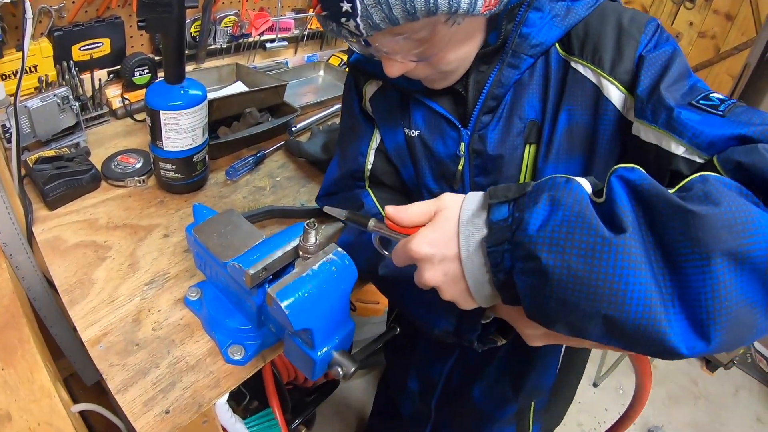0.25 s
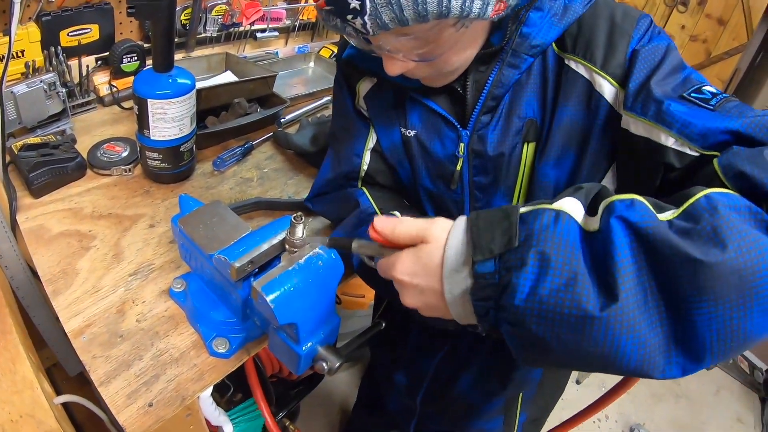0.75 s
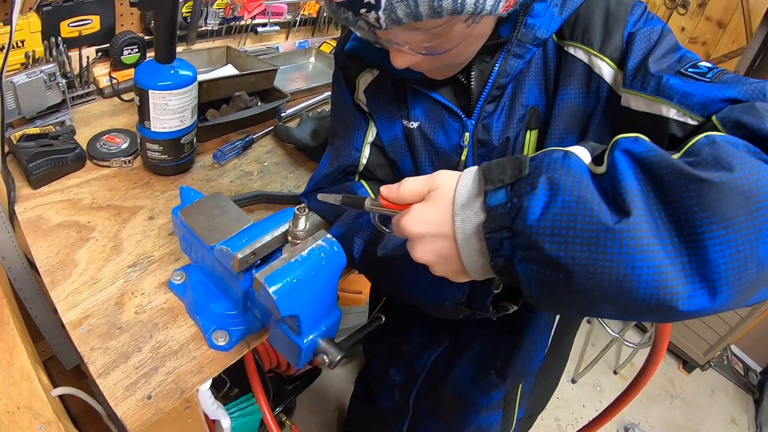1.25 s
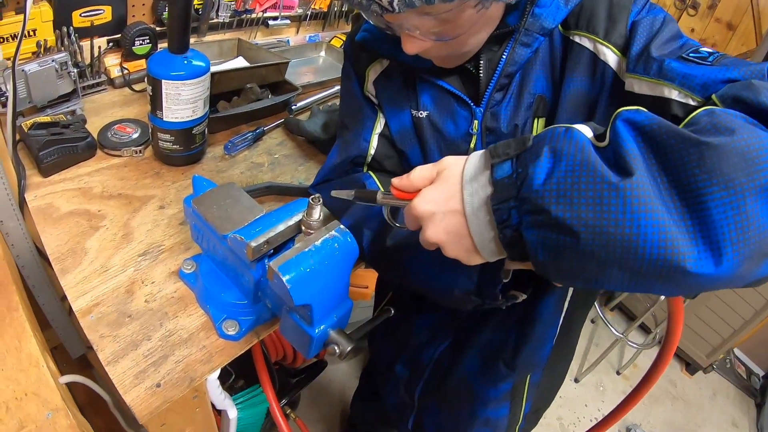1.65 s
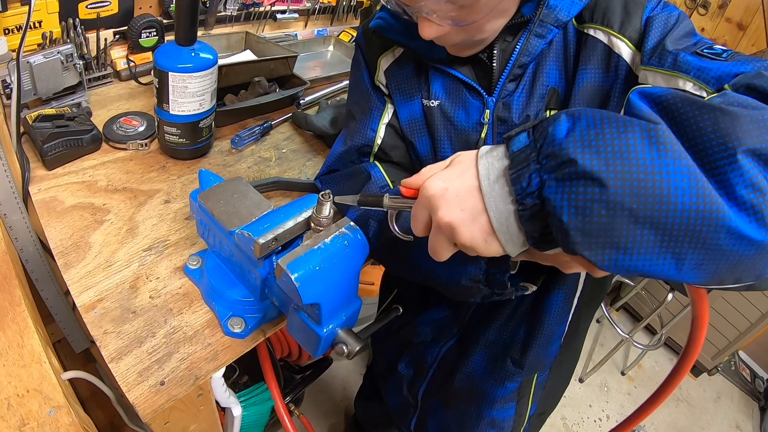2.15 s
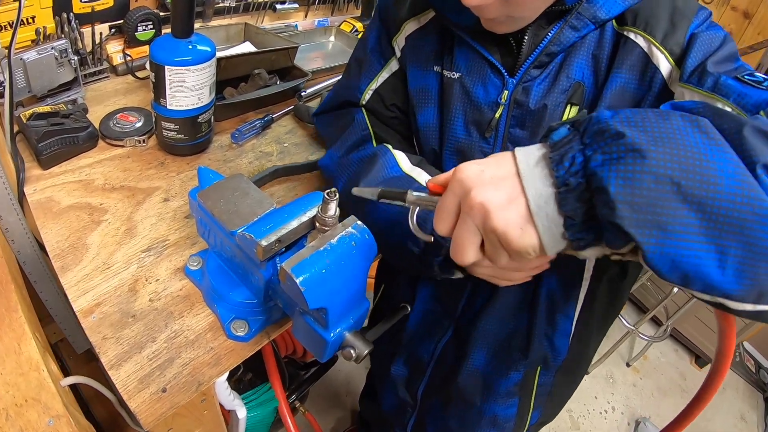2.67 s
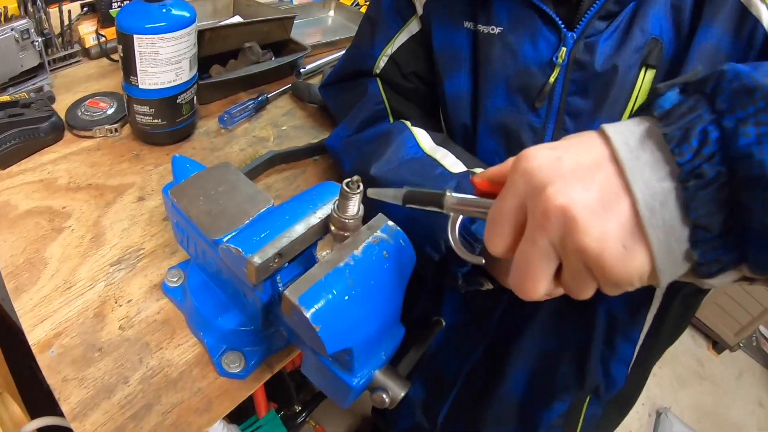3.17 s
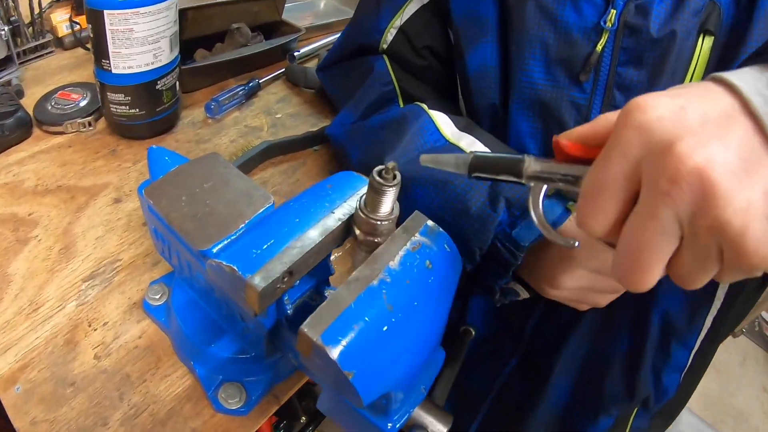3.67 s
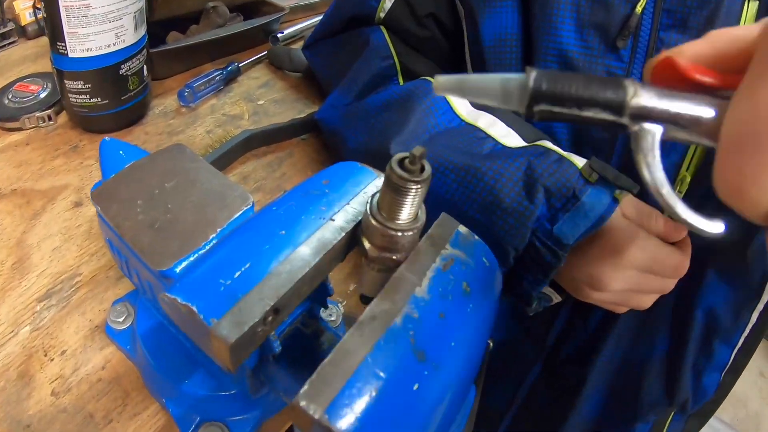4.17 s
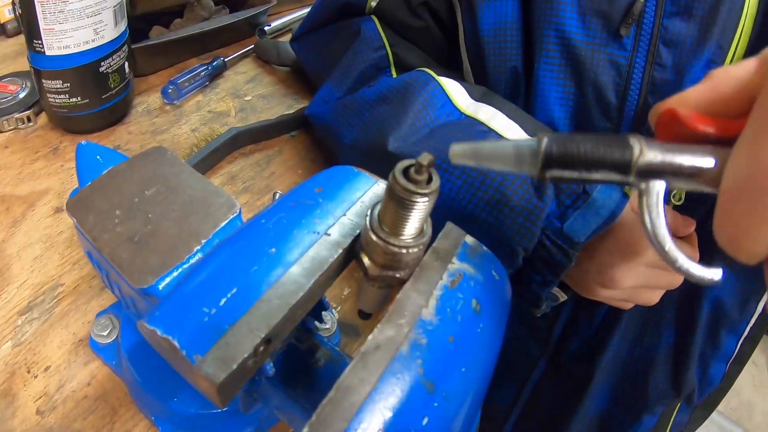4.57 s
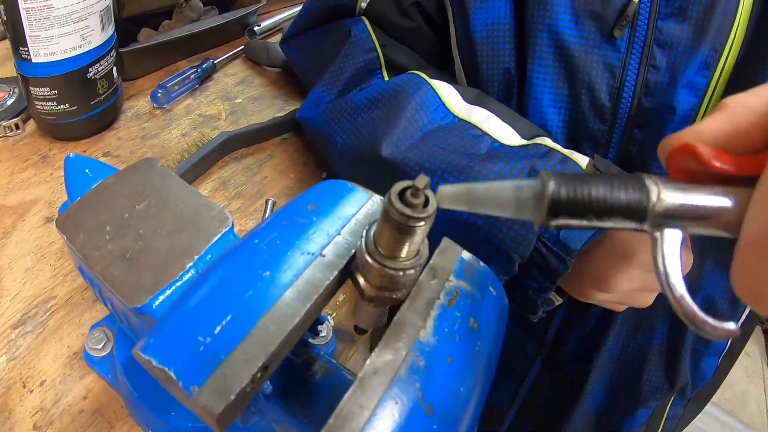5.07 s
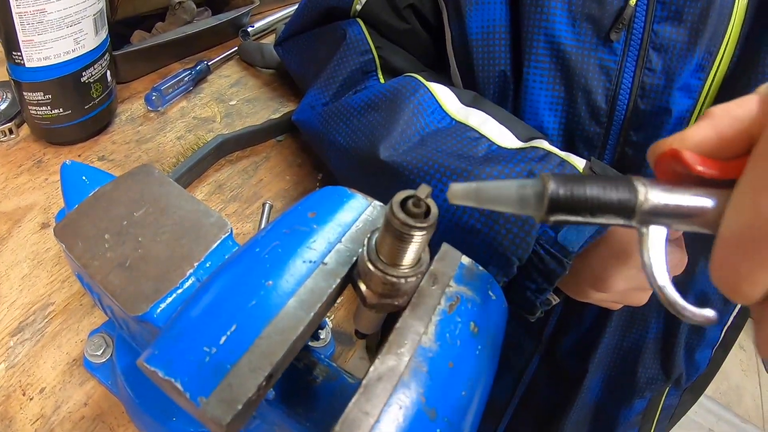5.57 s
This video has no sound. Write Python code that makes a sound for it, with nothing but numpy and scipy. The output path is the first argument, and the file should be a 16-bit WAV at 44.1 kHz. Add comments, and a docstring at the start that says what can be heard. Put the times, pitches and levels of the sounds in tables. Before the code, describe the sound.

A blow gun's compressed air hisses loudly, pauses about half a second, then returns, howling shrilly whenever it sweeps across a small hollow metal part.

```python
"""A blow gun's jet roars and sizzles over a small hollow metal part; its howl near 7 kHz swells at each crossing.
Jet noise is coloured turbulence; the howl is that turbulence through a moving resonance, the whistle through a still one.
The trigger is let go once, and a dull hiss lingers, its treble fading evenly like room reverberation. Stray air thumps
mostly on the right, a hand scuffs the camera housing, and a low lumpy rumble, a far machine at first, turns wind-like
as a port pair gives way to one sheltered microphone. A gain control ducks whatever is too loud and soon recovers."""
import sys
import numpy as np
from scipy import signal
from scipy.fft import rfft, irfft, next_fast_len
from scipy.io import wavfile

SR = 44100
rng = np.random.default_rng(int(sys.argv[2]) if len(sys.argv) > 2 else 0)


def generate_wav(signal):
    """Clip the signal to [-1, 1] and save it as 16-bit WAV at the path in sys.argv[1]."""
    frames = np.transpose(np.atleast_2d(signal))
    scaled = np.clip(frames, -1, 1) * 32767
    pcm = np.round(scaled).astype(np.int16)
    wavfile.write(sys.argv[1], SR, pcm)


N = 257103
T = np.arange(N) / SR
SIZE = next_fast_len(N)
HZ = np.maximum(np.arange(SIZE // 2 + 1) * SR / SIZE, 1.)  # spectral bins


def jet():
    """Turbulent mixing noise in bands, plus the howl that the hollow's resonance draws from shed eddies."""
    # open jet between crossings, as hand and camera move: (time [s], roar level [dB], howl level [dB])
    open_jet = [(0, -28, -26.5), (.55, -29, -26.5), (1.07, -27.5, -24.5), (1.4, -29, -25.5),
                (1.75, -30, -23), (1.95, -30, -28.5), (2.5, -31, -29.5), (2.95, -32.5, -29),
                (3.5, -33.5, -30.5), (3.8, -39, -34), (4.05, -35.5, -32.5), (4.35, -34, -33.5),
                (4.65, -31, -29), (5.3, -32, -27.5), (5.83, -32, -28)]
    # treble relative to the roar: (time [s], sizzle level [dB], topmost air level [dB])
    treble_levels = [(0, -0.5, -12), (2.0, 0, -11), (2.3, -3, -14.5), (3.0, 1, -11.5), (3.5, -4, -11.5),
                     (3.7, -8.5, -7), (4.3, -9, -7.5), (4.45, -9, -16), (4.8, -12, -19), (5.83, -12, -19)]
    treble_follows = 0.6  # share of the roar's swell in dB that sizzle and air take part in
    rim_above_hz = 1400  # the rim lifts only the brighter part of the roar
    _, middle, treble = port_shares()

    # relative spectral density at the ports and the single microphone: (frequency [Hz], density [dB per Hz])
    roar_at_ports = [(150, -26), (500, -27), (1000, -15), (1900, -6.5), (2300, -5.5), (2680, -2),
                     (2950, -6.5), (3220, -2), (3500, -5.5), (4400, -8.5), (4800, -5), (5150, -7),
                     (5550, -4), (8000, -9), (9000, -33)]
    roar_sheltered = [(150, -6.5), (600, -8), (1500, -3.5), (2100, -1.5), (2650, 1.5), (3100, -3),
                      (3600, 1.5), (4000, -4.5), (4600, -6.5), (5500, -3.5), (8200, -9.5), (9000, -27)]
    roar = hiss(roar_at_ports, roar_sheltered, middle, patchy_db=1.6, rate=2.6)
    whistle = nozzle_whistle(middle)
    # the same for the sizzle: (frequency [Hz], density [dB per Hz])
    sizzle_at_ports = [(8000, 0.5), (8700, -3.5), (9400, 1.5), (10000, -4.5), (10600, -13.5), (11400, -9.5),
                       (12000, -25)]
    sizzle_sheltered = [(8000, 4), (8800, 9), (9700, -3), (10500, 1.5), (11300, 4), (12000, -10)]
    sizzle = hiss(sizzle_at_ports, sizzle_sheltered, middle, patchy_db=0.98, rate=16)
    # the same for the topmost air: (frequency [Hz], density [dB per Hz])
    air_at_ports = [(11000, -18), (11800, 1), (13000, 0), (14000, -5.5), (15000, -12), (16200, -22)]
    air_sheltered = [(11000, -15), (11800, 7), (12800, -2), (13400, -10), (14000, -45)]
    air = hiss(air_at_ports, air_sheltered, treble, patchy_db=0.0, rate=30)
    howl = hollow_howl(middle)

    sizzle_db, air_db = in_time(treble_levels)
    top = from_db(sizzle_db) * sizzle + from_db(air_db) * air
    broad = roar + whistle
    low = signal.sosfiltfilt(signal.butter(2, rim_above_hz, fs=SR, output="sos"), broad)
    roar_db, howl_db = in_time(open_jet)
    howl_swell_db, roar_swell_db = crossings()
    swelled = low + from_db(roar_swell_db) * (broad - low)
    swelled_top = from_db(treble_follows * roar_swell_db) * top
    blown = from_db(roar_db) * (swelled + swelled_top) + from_db(howl_db + howl_swell_db) * howl
    return trigger() * blown


def hollow_howl(share):
    """Cavity resonance: eddies shed in quick bunches at the rim excite a moving pole pair; others stay broad."""
    # (time [s], resonance centre [Hz])
    centres = [(0, 6640), (1.32, 6550), (1.54, 7380), (2.65, 6730), (3.7, 7250), (3.88, 7630), (5.2, 7330),
               (5.38, 7000), (5.83, 7500)]
    # what each microphone set passes, ports then single: (frequency [Hz], density [dB per Hz])
    howl_at_ports = [(4000, -18), (5300, -10.5), (6200, 3), (7600, 6.5), (8500, -10), (10500, -43)]
    howl_sheltered = [(4000, 0), (5000, -10.5), (5700, 9.5), (6500, 5), (7300, 10.5), (8300, 5.5),
                      (8800, -21), (10500, -55)]
    width_hz, skirt_db = 1420, -4.5  # width of each resonant stage; level of the broad part
    eddies = hiss(howl_at_ports, howl_sheltered, share, patchy_db=0.35, rate=100)
    outside = np.roll(eddies, SR // 10, axis=1)  # shifted 0.1 s to stand for eddies that miss the hollow
    return rms_one(resonate(eddies, in_time(centres)[0], width_hz) + from_db(skirt_db) * outside)


def nozzle_whistle(share):
    """Narrow-band noise: white turbulence through a fixed resonance gives a breathy, wavering whistle."""
    # (time [s], level relative to the roar [dB])
    whistle_levels = [(0, -11), (.6, -10), (1.02, -6), (1.65, -7.5), (2.2, -11), (3.4, -11.5), (3.7, -10)]
    centre_hz, width_hz = 3870, 480  # width of each resonant stage
    pair, single = [irfft(white, SIZE)[..., :N] for white in white_pair()]
    turbulence = np.sqrt(1 - share) * pair + np.sqrt(share) * single
    tone = resonate(turbulence, np.full(N, centre_hz), width_hz) * from_db(1.5 * drift(19))
    return from_db(in_time(whistle_levels)[0]) * tone


def crossings():
    """Edge and cavity excitation in dB: it builds as the jet enters, holds, and drops as it leaves."""
    # (enters [s], stays, at least the build-up time [s], howl swell [dB], roar swell [dB])
    passes = [(1.5, 0.16, 3.5, 0.3), (1.76, 0.032, 4, .4), (1.965, 0.071, 8, 0.2), (2.087, 0.091, 17, 6.5),
              (2.298, 0.099, 12, 1.5), (2.951, 0.12, 13, 4), (3.214, 0.14, 14, 4.5), (3.535, 0.07, 14, 4),
              (4.681, 0.15, 13, 5), (4.98, 0.13, 7, 2), (5.28, 0.16, 12.5, 3), (5.665, .11, 4.5, 2)]
    enter_s, leave_s, roar_leads_s = 0.053, .03, 0.019  # the rim is met before the hollow
    howl_db, roar_db = 0, 0
    for s, stays, howl_swell, roar_swell in passes:
        leaves = s + max(stays, enter_s)
        corners = np.array([s, s + enter_s, leaves, leaves + leave_s])
        howl_db = howl_db + howl_swell * np.interp(T, corners, [0, 1, 1, 0])
        roar_db = roar_db + roar_swell * np.interp(T + roar_leads_s, corners, [0, 1, 1, 0])
    return howl_db, roar_db


def trigger():
    """Valve throttling: the gain falls exponentially after release and climbs back to full when pressed."""
    let_go_s, pressed_s = 0.5486, 1.064  # starts to close; fully open again
    close_db_per_s, open_db_per_s = 469, 752
    closing_db = close_db_per_s * (let_go_s - T)
    opening_db = open_db_per_s * (T - pressed_s)
    return from_db(np.minimum(np.maximum(closing_db, opening_db), 0))


def lingering_hiss():
    """Exponential decay: after release a dull hiss drops once in its body; its treble fades like reverberation."""
    # relative spectral density of body and treble: (frequency [Hz], density [dB per Hz])
    body_colour = [(400, 3.5), (700, -4.5), (1200, -2), (1800, 2), (2300, 1), (4000, -5.5), (5200, -22)]
    treble_colour = [(4500, -10), (6400, 0), (7600, -2), (8800, -4), (10500, -10), (13000, -21),
                     (14500, -40)]
    from_s, until_s = .6, 1.064  # until the trigger is fully down again
    level_db, drops_s, drop_db, drop_takes_s = -47.5, 0.823, 8, .03
    treble_level_db, treble_db_per_s = -44.5, 56
    pair = white_pair()[0]
    body_db = level_db - drop_db * np.clip((T - drops_s) / drop_takes_s, 0, 1)
    treble_db = treble_level_db - treble_db_per_s * np.maximum(T - from_s, 0)
    body = from_db(body_db) * coloured(pair, body_colour)
    treble = from_db(treble_db) * coloured(pair, treble_colour)
    return sounding(from_s, until_s) * (body + treble)


def gusts():
    """Wind pressure on a microphone: low noise independent at each port, and damped swings that suck first."""
    # lumpy wash: (full from [s], holds [s], level before the left and right offsets [dB])
    washes = [(2.33, 1.24, -53.5), (3.12, 0.11, -36), (3.35, 0.061, -29.5), (3.63, 0.1, -47)]
    # relative spectral density of the wash: (frequency [Hz], density [dB per Hz])
    wash_colour = [(9, -31), (15, -1.5), (94, 1), (189, -6), (400, -23), (700, -33), (1100, -53),
                   (1980, -100)]
    # amplitude is before damping: (start [s], left amplitude [dB], right amplitude [dB], swing rate [Hz])
    buffets = [(2.364, -60, -21, 71), (2.394, -60, -23.5, 71), (2.492, -25.5, -34, 44.3),
               (2.569, -50, -23, 68), (2.7, -60, -19.5, 64.5), (3.133, -50, -14.5, 74),
               (3.194, -21, -40, 40.4), (3.219, -50, -17, 69.6), (3.357, -60, -15.5, 61),
               (3.393, -60, -19, 60), (3.42, -45, -23, 61.4), (3.459, -51, -20.5, 81),
               (3.648, -52, -23, 91.5), (3.689, -41, -30, 80), (5.312, -19.5, -21.5, 75.6)]
    left_db, right_db = -7, 5.5  # offsets of the wash
    damping_cycles = 0.91  # cycles over which a buffet dies to 1/e
    own = coloured(rfft(rng.standard_normal((2, SIZE))), wash_colour)
    own = own * from_db([3.0 * drift(31), 6.4 * drift(21.6)])
    out = from_db([[left_db], [right_db]]) * bursts(washes, 0.03, 148) * rms_one(own)
    for s, buffet_left_db, buffet_right_db, hz in buffets:
        cycles = np.arange(SR // 10) / SR * hz
        onset = np.minimum(7.2 * cycles, 1)
        swing = -np.sin(2 * np.pi * cycles) * np.exp(-cycles / damping_cycles) * onset
        start = round(s * SR)
        out[:, start:start + len(swing)] += np.outer(from_db([buffet_left_db, buffet_right_db]), swing)
    both = out.mean(axis=0)  # all that is left once the change-over is complete
    return both + np.sqrt(1 - port_shares()[2]) * (out - both)


def handling():
    """Friction noise and modal ringing: a hand shifts on the camera housing, scuffing and knocking it."""
    # (full from [s], holds [s], level [dB])
    scuffs = [(2.612, .05, -36.5), (2.735, 0.06, -39)]
    # relative spectral density of the scuffs: (frequency [Hz], density [dB per Hz])
    scuff_colour = [(120, -25), (180, -4), (280, 2), (450, 0.5), (700, -6.5), (1200, -2), (1800, -8),
                    (2600, -19)]
    # (time [s], strength [dB], to which each mode's level is added)
    knocks = [(2.612, -28), (2.652, -27.5), (2.773, -40)]
    # housing modes: (frequency [Hz], relative level [dB], time to fall 60 dB [s])
    modes = [(367, -6, 0.071), (430, -4, 0.027), (990, -6, 0.016), (1600, -8, 0.033)]
    scuff = coloured(white_pair()[0], scuff_colour) * from_db(1.2 * drift(70))
    out = bursts(scuffs, 0.01, 85) * scuff
    for hz, level_db, t60 in modes:
        clicks = np.full(N, 1e-18)  # tiny floor keeps the filter out of denormal numbers
        for s, knock_db in knocks:
            clicks[round(s * SR)] = from_db(knock_db + level_db)
        r, w = from_db(-60 / (t60 * SR)), 2 * np.pi * hz / SR
        out = out + signal.lfilter([0, np.sin(w)], [1, -2 * r * np.cos(w), r * r], clicks)
    return out


def rumble():
    """Low-frequency coherence: a low lumpy rumble, a far machine at first, wind-like at the single microphone."""
    # (time [s], level [dB])
    rumble_levels = [(0, -48.5), (.76, -51.5), (1.14, -49), (2.2, -52.5), (3.44, -50.5), (4.2, -41.5),
                     (5.83, -43.5)]
    # relative density at the ports, then at the single microphone: (frequency [Hz], density [dB per Hz])
    rumble_at_ports = [(20, -30), (35, -9), (57, 3), (80, -2), (105, -38), (160, -2.5), (200, -9.5),
                       (300, -17), (450, -22), (800, -20)]
    rumble_sheltered = [(12, -39), (20, -10), (44, -1), (177, 1.5), (240, -5), (406, -13), (447, -17),
                        (900, -15.5), (1170, -13), (1980, -120)]
    lumpy = hiss(rumble_at_ports, rumble_sheltered, port_shares()[0], patchy_db=2.5, rate=4.5)
    return from_db(in_time(rumble_levels)[0]) * lumpy


def port_shares():
    """Power-complementary crossfade: the single microphone's share of power in bass, middle and treble."""
    # one row per band: (port pair's level beforehand [dB], fade starts [s], fade rate [dB per s])
    changeover = [(-1, 3.67, 11), (-0.15, 3.664, 99), (-.1, 4.36, 300)]
    shares = []
    for before_db, s, db_per_s in changeover:
        ports_db = min(before_db, 0) - db_per_s * np.maximum(T - s, 0)
        shares.append(1 - from_db(ports_db) ** 2)
    return shares


def white_pair():
    """Partial coherence: white spectra at two ports share a phase-shifted common part; the single one is its own."""
    # (frequency [Hz], phase by which left leads [rad])
    port_phase = [(20, 0), (700, .6), (1720, 1.6), (2150, 2.9), (2900, 4.4), (3600, 5.5), (4100, 6.3),
                  (5000, 7.1), (5900, 9.2), (6500, 11.8), (7200, 12.7), (7900, 14.2), (13000, 17.3),
                  (15000, 21)]
    # (frequency [Hz], share of power common to both [0-1])
    port_common = [(60, 0.97), (300, 0.78), (1000, 0.25), (3000, 0.51), (5000, 0.68), (7000, 0.5),
                   (8500, 0.27), (14000, 0.084)]
    # (frequency [Hz], left minus right level [dB])
    port_balance = [(60, -2), (700, 1), (1300, 0.5), (2000, 5), (3300, -0.5), (5500, 5.5), (9000, -0.5),
                    (12000, -2.5), (15000, 2)]
    common, left, right, single = rfft(rng.standard_normal((4, SIZE)))
    alike = np.clip(at_hz(port_common), 0, 1)
    turn = np.exp(.5j * at_hz(port_phase))
    side = from_db(at_hz(port_balance) / 2)
    shared, apart = np.sqrt(alike) * common, np.sqrt(1 - alike)
    pair = np.array([(shared * turn + apart * left) * side,
                     (shared / turn + apart * right) / side])
    return pair, single


def hiss(at_ports, sheltered, share, patchy_db, rate):
    """Turbulent noise: incoherent powers of both microphone sets add, and the strength wavers."""
    pair, single = white_pair()
    heard = np.sqrt(1 - share) * coloured(pair, at_ports) + np.sqrt(share) * coloured(single, sheltered)
    return heard * from_db(patchy_db * drift(rate))


def coloured(spectrum, colour):
    """Spectral shaping: noise of a given density at rms 1, with nothing outside the ends of the table."""
    inside = (HZ > colour[0][0]) & (HZ < colour[-1][0])
    return rms_one(irfft(spectrum * from_db(at_hz(colour)) * inside, SIZE)[..., :N])


def resonate(x, centre_hz, width_hz):
    """Resonance: two equal pole pairs in cascade, their centre moving in short blocks; rms 1."""
    out, state = np.empty_like(x), np.zeros((2, 2, 2))
    r = np.exp(-np.pi * width_hz / SR)
    for i in range(0, N, 512):
        w = 2 * np.pi * centre_hz[i] / SR
        stage = [1 - r * r, 0, r * r - 1, 1, -2 * r * np.cos(w), r * r]
        out[:, i:i + 512], state = signal.sosfilt([stage, stage], x[:, i:i + 512], zi=state)
    return rms_one(out)


def drift(rate):
    """Slow random modulation: noise through two one-pole low-passes with corners at rate in Hz, spread 1."""
    r = np.exp(-40 * np.pi * rate / SR)  # computed at a twentieth of the sample rate
    noise = rng.standard_normal(N // 20 + 2002)
    slow = signal.lfilter([1], [1, -2 * r, r * r], noise)[2000:]
    return np.interp(np.arange(N) / 20, np.arange(len(slow)), rms_one(slow))


def bursts(rows, rise_s, dies_db_per_s):
    """Power summation: gain of overlapping bursts that rise ahead of their time, hold and die exponentially."""
    each = []
    for s, holds, db in rows:
        rise = np.clip((T - s) / rise_s + 1, 0, 1)
        each.append(rise * from_db(db - dies_db_per_s * np.maximum(T - s - holds, 0)))
    return np.sqrt(np.sum(np.square(each), axis=0))


def sounding(first, last):
    """Linear gating: 1 between two moments, with 15 ms fades outside."""
    return np.interp(T, [first - .015, first, last, last + .015], [0, 1, 1, 0])


def in_time(rows):
    """Linear interpolation: every column of a curve at every sample."""
    s, *columns = np.transpose(rows)
    return [np.interp(T, s, c) for c in columns]


def at_hz(points):
    """Interpolation on a logarithmic frequency axis: a table read at every spectral bin."""
    hz, value = np.transpose(points)
    return np.interp(np.log(HZ), np.log(np.maximum(hz, 1)), value)


def from_db(db):
    """Logarithmic level: decibels to amplitude gain."""
    return 10 ** (np.asarray(db) / 20)


def rms_one(x):
    """Power normalisation: scale to rms 1."""
    return x / np.sqrt(np.mean(x ** 2) + 1e-20)


def gain_control(x):
    """Compression: ducks by a share of the excess over a threshold and recovers within a fraction of a second."""
    above_db, excess_share = -19.5, 0.6
    listens_s, recovers_s = 0.012, 0.06  # time constants
    r = np.exp(-1 / (listens_s * SR))
    power = signal.lfilter([1 - r], [1, -r], np.mean(x ** 2, axis=0))
    level_db = 10 * np.log10(power + 1e-12)
    over_db = np.clip(excess_share, 0, 1) * np.maximum(level_db - above_db, 1e-3)
    # peak hold with exponential decay, as a running maximum on a tilted logarithmic scale
    held_db = np.exp(np.maximum.accumulate(np.log(over_db) + T / recovers_s) - T / recovers_s)
    return x * from_db(-held_db)


def scene():
    """Linear superposition: all sources add at the microphones."""
    return jet() + lingering_hiss() + rumble() + gusts() + handling()


def record(dry):
    """Band limitation: gain control, then a steep elliptic low-pass at 15.7 kHz."""
    low_pass = signal.ellip(12, .5, 80, 15700, fs=SR, output="sos")
    return signal.sosfilt(low_pass, gain_control(dry))


dry = scene()
out = record(dry)
generate_wav(out)
```